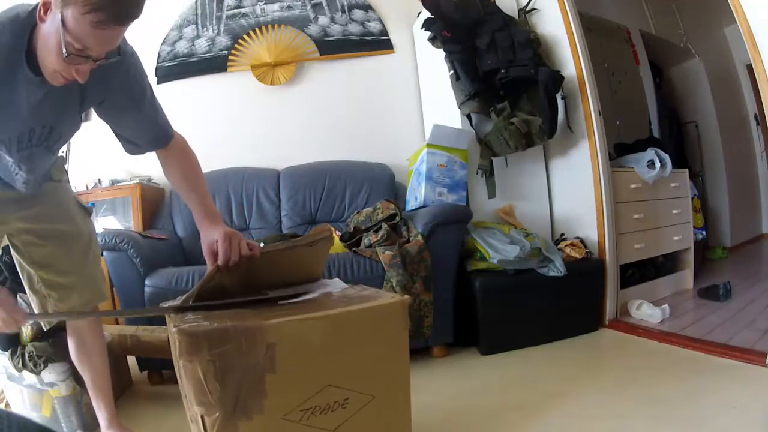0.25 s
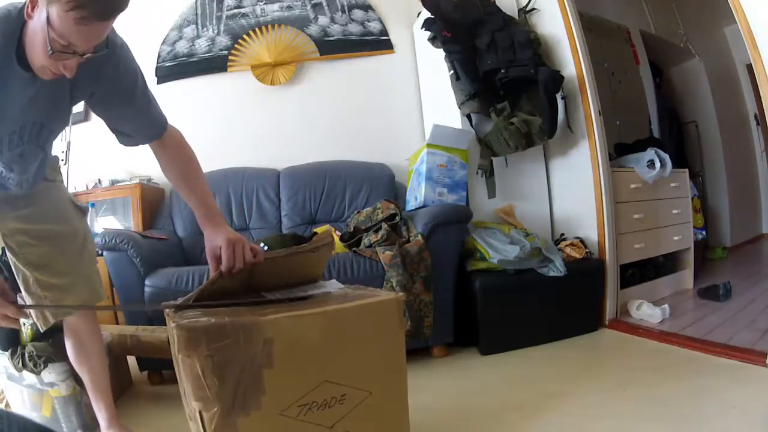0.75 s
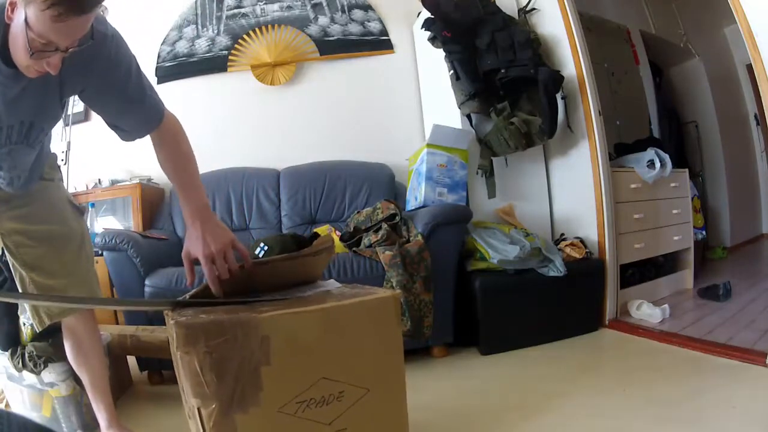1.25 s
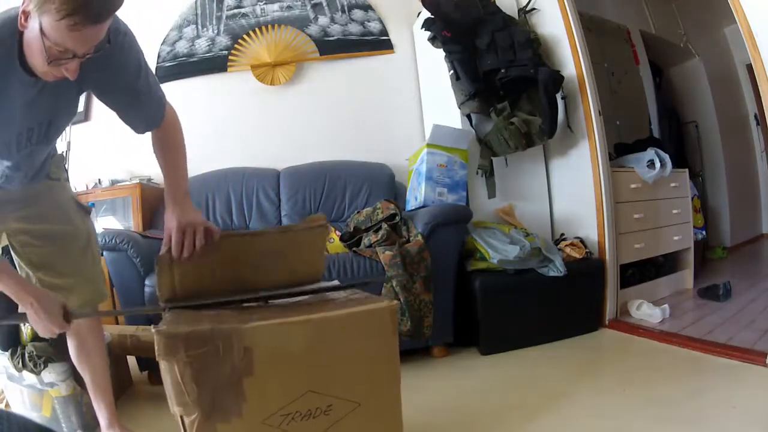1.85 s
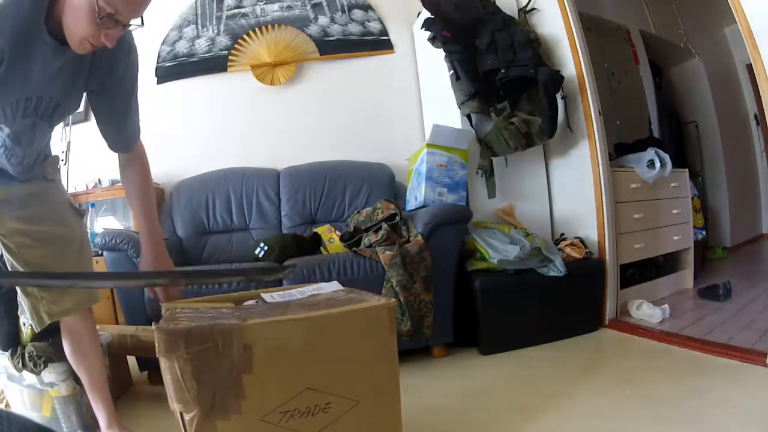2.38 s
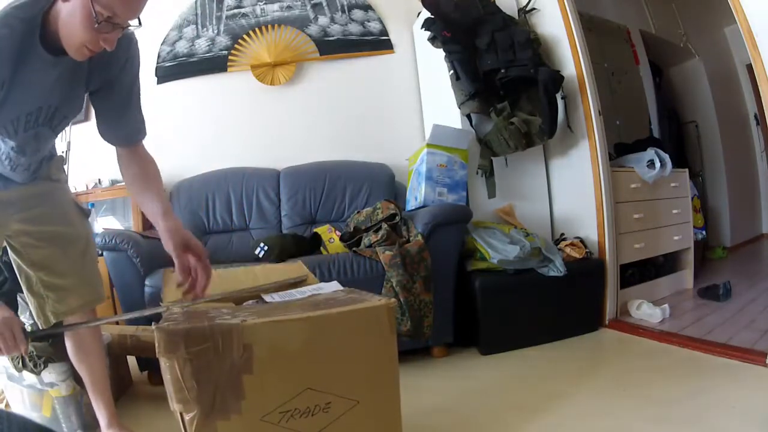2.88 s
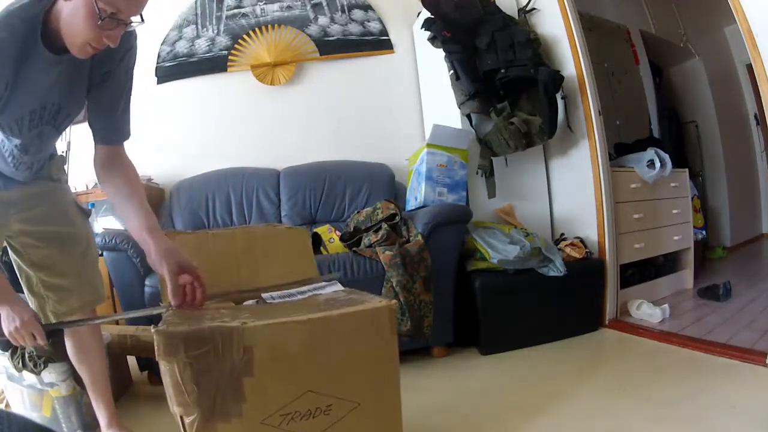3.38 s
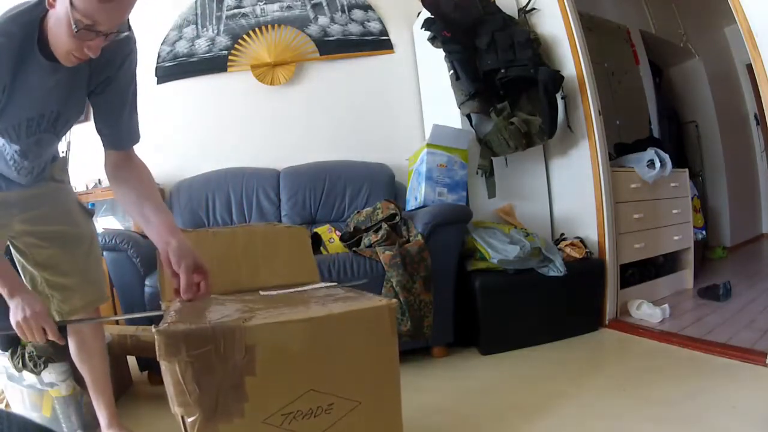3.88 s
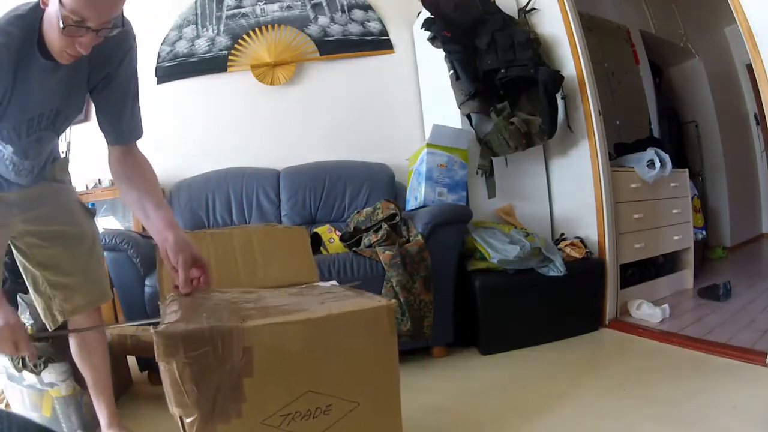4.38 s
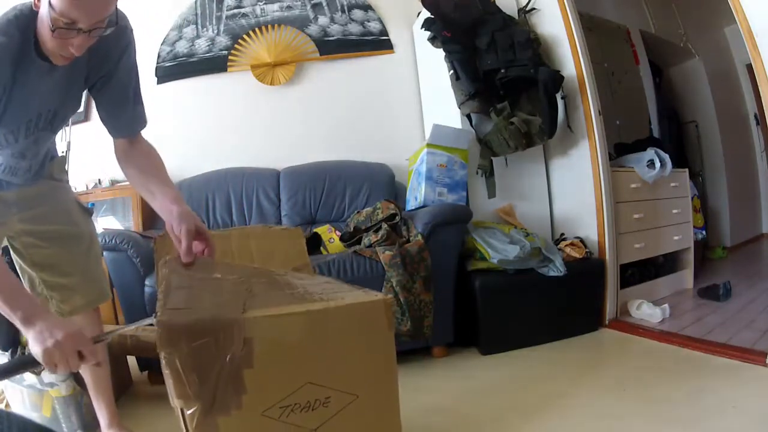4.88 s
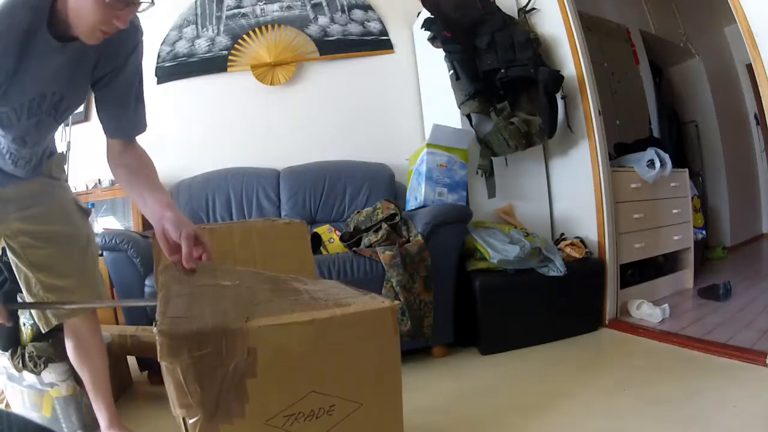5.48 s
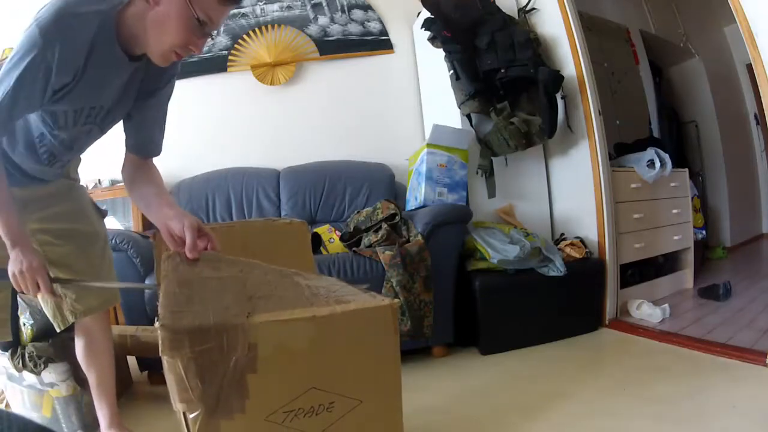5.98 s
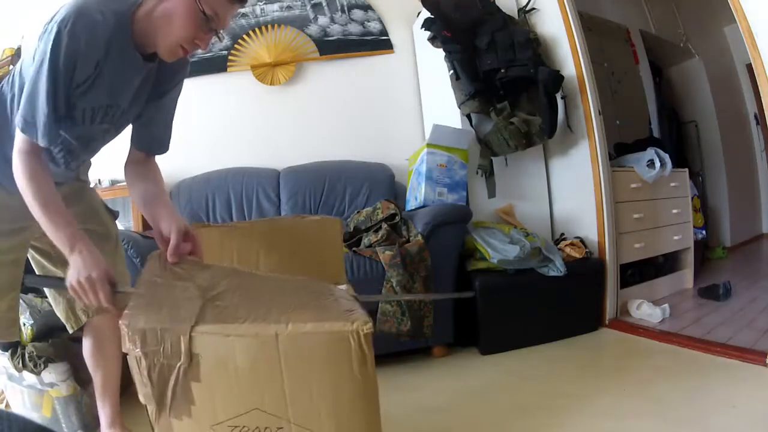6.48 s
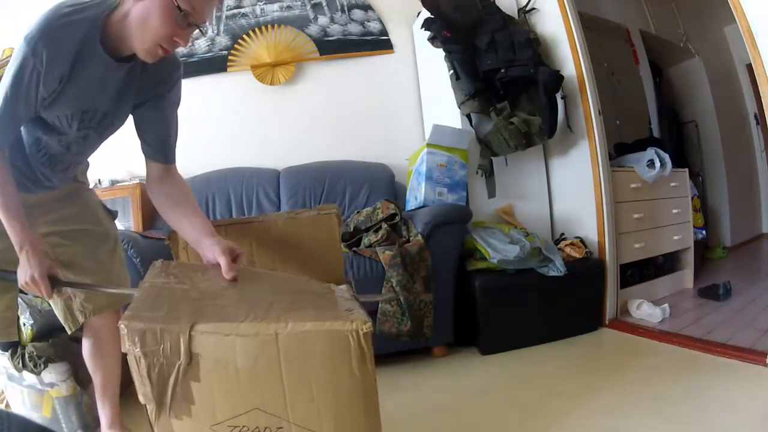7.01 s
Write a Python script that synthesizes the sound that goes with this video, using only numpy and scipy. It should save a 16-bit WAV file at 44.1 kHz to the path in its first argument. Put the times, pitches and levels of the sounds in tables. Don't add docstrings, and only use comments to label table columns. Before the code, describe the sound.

Indoors, cardboard rumbles and rasps in short irregular strokes, flaps thudding lightly. A thin squeak of blade on tape follows, then small crackles. In the middle come sharp, boxy bangs with snapping tape, the loudest just before five seconds, and another duller boom later. Rustling scrapes and weak knocks finish it. A camera microphone under a metre away on the floor sounds boxed-in and low-fidelity, with a short room echo and a faint fan.

```python
import sys
import numpy as np
from scipy import signal
from scipy.fft import rfft, irfft
from scipy.io import wavfile
from scipy.ndimage import uniform_filter1d

SR = 44100
rng = np.random.default_rng(int(sys.argv[2]) if len(sys.argv) > 2 else 0)


def transcribe(u):
    v = np.clip(np.atleast_2d(u).T, -1, 1)
    q = np.round(v * 32767).astype(np.int16)
    wavfile.write(sys.argv[1], SR, q)


def linear_from_db(decibels):
    return 10 ** (np.asarray(decibels, float) / 20)


N = 319725

SIZE = 32768
HZ = np.fft.rfftfreq(SIZE, 1 / SR) + 1e-3
LONG_HZ = np.fft.rfftfreq(N, 1 / SR) + 1e-3
DELAY_S = .0025


def colour(points, hz):
    f, db = np.log2(np.transpose(points)[0]), np.transpose(points)[1]
    x = np.log2(hz)
    octaves_outside = np.clip(f[0] - x, 0, 4) + np.clip(x - f[-1], 0, 4)
    return np.interp(x, f, db) - 24 * octaves_outside


def causal(db):
    cepstrum = irfft(db * np.log(10) / 20)
    half = len(cepstrum) // 2
    cepstrum[1:half] *= 2
    cepstrum[half + 1:] = 0
    return np.exp(rfft(cepstrum))


def bump(hz, centre_hz, octaves):
    return np.exp(-.5 * (np.log2(hz / centre_hz) / octaves) ** 2)


def shaped(x, db):
    y = irfft(rfft(x) * linear_from_db(db), len(x))
    return y / np.std(y)


def grains(rate, spread_db):
    size = np.minimum(rng.exponential(size=N), 4)
    slips = rng.random(N) < rate / SR
    return slips * rng.standard_normal(N) * linear_from_db(spread_db * size)


def walk(rate):
    k = int(SR / rate)
    steps = np.repeat(rng.standard_normal(N // k + 1), k)
    return 0.78 * uniform_filter1d(uniform_filter1d(steps, k), k)[:N]


# (time after the direct sound [s], sign, level [dB])
ECHOES = [(.0013, -0.47, -4.5), (.006, 0.64, -19.5), (.0125, -0.5, -3.5), (.019, 0.77, -16), (.027, 1, -17)]


def room(t60, tail_db, echo_db, direct_db=0.):
    t = np.arange(SIZE) / SR
    decay = linear_from_db(tail_db - np.minimum(60 * t / max(t60, .05), 200))
    build_up = 1 - np.exp(-t / 0.0024)
    tail = decay * build_up * rng.standard_normal(SIZE) * (t < .6)
    early = np.zeros(SIZE)
    early[0] = linear_from_db(direct_db)
    for n, (s, sign, db) in enumerate(ECHOES):
        k = int(s * SR)
        early[k] += sign * linear_from_db(db + (echo_db if n else direct_db))
        early[k:k + 60] += linear_from_db(db + echo_db - 18.5) * rng.standard_normal(60)
    return -rfft(early) + rfft(tail) * linear_from_db(-7 * bump(HZ, 151, 0.44))


def add(out, s, spectrum, peak_db):
    k = int(s * SR)
    y = irfft(spectrum)[:N - k]
    out[k:k + len(y)] += y * linear_from_db(peak_db) / np.abs(y).max()


# (frequency [Hz], level [dB per Hz])
AIR = [(12, -55), (20, -4.5), (101, -7), (175, -3), (202, 1.5), (263, -1), (342, -3), (414, -7),
       (501, -9.5), (771, -15.5), (868, -22.5), (1000, -25.5), (1160, -31), (3470, -31), (6000, -42.5),
       (7800, -91), (13200, -120)]
# (frequency [Hz], width [Hz], level [dB])
FAN = [(96.4, 6.8, -59.5), (214.8, 5.2, -52.5), (304, 22, -63), (344.8, 40, -49), (483, 8.3, -81),
       (704, 18, -83), (968, 14, -68), (2940, 230, -83.5)]


def air():
    out = linear_from_db(-45 + 0.21 * walk(4.3)) * shaped(rng.standard_normal(N), colour(AIR, LONG_HZ))
    for f, width, db in FAN:
        hum_db = -20 * np.log10(1 + (2 * (LONG_HZ - f) / width) ** 2)
        out += linear_from_db(db) * shaped(rng.standard_normal(N), hum_db)
    return out


def drone():
    t = np.arange(N) / SR
    middle_s, length_s, pitch_hz, level_db = 5.25, .2, 99.4, -45.5
    swell = np.exp(-.5 * ((t - middle_s) / length_s) ** 2)
    return linear_from_db(level_db + 1.5 * walk(12)) * swell * np.sin(2 * np.pi * pitch_hz * t)


# (time [s], peak level [dB], board frequency [Hz], ring t60 [s])
THUDS = [(0.084, -29.5, 90, 0.49), (0.516, -23.5, 54.5, 0.31), (0.737, -25.5, 60, 0.26),
         (1.02, -33.5, 90, 0.19), (1.257, -38, 90, .2), (1.44, -34.5, 69.6, 0.41), (1.621, -37, 99, 0.2),
         (1.652, -27, 55, 0.22), (1.7, -27, 48, 0.48), (2.657, -19.5, 55, .25), (2.84, -19, 101, 0.22),
         (3.348, -30, 65.5, 0.15), (3.93, -30, 69.5, 0.28), (4.086, -17.5, 58, 0.16), (4.35, -25, 55, 0.24),
         (4.816, -32, 47, 0.15), (5.519, -34, 55, 0.22), (5.876, -26, 80.4, 0.33), (5.961, -33, 50, 0.16),
         (6.201, -35, 109, 0.42), (6.392, -21, 50, 0.086), (7.118, -36, 45.4, 0.34), (7.18, -32, 45, 0.31)]


def thuds():
    out = np.zeros(N)
    for s, db, hz, t60 in THUDS:
        boards = causal(40 * bump(HZ, 87, 1.85) + 12 * bump(HZ, hz, 0.35))
        add(out, s + DELAY_S, boards * room(t60, tail_db=-27.5, echo_db=-4), db)
    return out


# (time [s], blade drag [dB], weight on the panels [dB],
# floor shake relative to the panel rumble [dB])
GRIP = [(0, -50, -37.5, -16), (.7, -54.5, -46, -8), (1.85, -54.5, -47.5, -12.5), (2.05, -64, -49.5, -9.5),
        (3.0, -71, -47, -5), (3.2, -69, -51, -5), (3.35, -57, -46, -11), (3.58, -81, -45, -13),
        (3.88, -64, -46.5, -8.5), (4.12, -44.5, -36, -14), (4.25, -50.5, -36.5, -6),
        (4.55, -49.5, -41.5, -16), (4.919, -40, -32.5, -18), (5.219, -55, -40, -16),
        (5.3, -68.5, -48.5, -13), (6.15, -69, -47.5, -9.5), (6.249, -56, -39.5, 1.5),
        (7.25, -59, -44.5, -37)]
# (time at full speed [s], hold [s], scrape level [dB], panel rumble over scrape [dB])
STROKES = [(0.083, 0.038, -43.5, 11.5), (0.285, 0.047, -40, 6.5), (0.363, 0.078, -46, 9),
           (0.61, 0.028, -59.5, 17), (0.747, 0.12, -52.5, 10.5), (1.01, 0.038, -50.5, 2),
           (1.244, 0.037, -46.5, 8.5), (1.39, 0.046, -48, 8.5), (1.532, 0.057, -48, 9.5),
           (1.668, 0.066, -49.5, 20.5), (1.75, 0.045, -47, -8), (1.982, 0.02, -50.5, 8),
           (2.37, 0.078, -60, 15.5), (2.678, 0.015, -58, 9), (2.877, 0.034, -55, 6),
           (3.282, 0.027, -64, 14), (3.392, 0.12, -55.5, 12), (3.66, 0.022, -55.5, 7),
           (3.958, 0.13, -48.5, 5), (4.287, 0.13, -43, 4.5), (4.417, 0.079, -45, 11.5),
           (4.637, 0.24, -61, -2), (4.81, 0.023, -43.5, 19.5), (5.056, 0.18, -52, 11.5),
           (5.56, 0.029, -57, 10), (6.01, 0.056, -60.5, 17), (6.336, 0.038, -41.5, 2),
           (6.452, 0.02, -50, 7), (6.547, 0.02, -44.5, -5), (6.67, 0.072, -57, -8),
           (6.904, 0.023, -57.5, 13)]


def effort():
    speed_up_db_per_s, slow_down_db_per_s = 211, 136
    t = np.arange(0, N / SR + .002, .001)
    grip_s, *grip = np.transpose(GRIP)
    drag_db, weight_db, shake_db = (np.interp(t, grip_s, column) for column in grip)
    scrape, rumble = linear_from_db(2 * drag_db), linear_from_db(2 * weight_db)
    for s, hold, db, panel_db in STROKES:
        lost_db = speed_up_db_per_s * np.maximum(s - t, 0)
        lost_db = lost_db + slow_down_db_per_s * np.maximum(t - s - hold, 0)
        scrape = scrape + linear_from_db(2 * (db - lost_db))
        rumble = rumble + linear_from_db(2 * (db + panel_db - lost_db))
    levels = (10 * np.log10(scrape), 10 * np.log10(rumble), shake_db)
    return (np.interp(np.arange(N) / SR, t, db) for db in levels)


# (frequency [Hz], width [Hz], level [dB])
BOX = [(145, 99, 7.5), (186, 18, 0), (238.5, 17, 9), (310, 35, 7), (348, 6.1, 4), (400.6, 13.7, 7.5),
       (457, 120, -4.5), (474, 15, 0.5), (617, 23, 6), (716, 20, -0.5), (804, 81, 7)]


def resonances(hz, reach):
    return sum(k * db / (1 + (2 * (hz - f) / w) ** 2) for k, (f, w, db) in zip(reach, BOX))


# (frequency [Hz], level [dB per Hz])
SCRAPE = [(530, -16), (900, -5.5), (1030, -17), (1250, -9.5), (1360, -12.5), (1670, -7), (2020, -2),
          (2410, -4), (2910, 1.5), (3470, -6), (4030, -0.5), (5280, -7), (6000, -11.5), (7800, -42),
          (13200, -120)]


def hands():
    scrape_db, board_db, shake_db = effort()
    near = rfft(irfft(room(0.36, tail_db=-18.0, echo_db=-2.0)), N)
    moved = rfft(irfft(room(0.5, tail_db=-15.0, echo_db=-3.0)), N)

    def heard(x, path):
        return irfft(rfft(x) * path, N)

    board_colour = colour(BOOM, LONG_HZ) + resonances(LONG_HZ, np.full(len(BOX), .45))
    board = shaped(heard(grains(2000, spread_db=.6), near), board_colour)
    thump = shaped(rng.standard_normal(N), 40 * bump(LONG_HZ, 57.5, 3.72))

    place = np.pi / 2 * walk(3)
    slips = np.cos(place) * heard(grains(1200, spread_db=4.0), near)
    slips = slips + np.sin(place) * heard(grains(1200, spread_db=3.5), moved)

    fibres = colour(SCRAPE, LONG_HZ)
    dull = shaped(slips, fibres - 30 * (LONG_HZ > 2500))
    bright = shaped(slips, fibres - 30 * ((LONG_HZ <= 2500) | (LONG_HZ > 3500)))
    thin = shaped(slips, fibres - 30 * (LONG_HZ <= 3500))
    bands = linear_from_db(-5.5 + 1.5 * walk(13)) * dull
    bands = bands + linear_from_db(-4.0 + 1.5 * walk(11)) * bright
    bands = bands + linear_from_db(-4.5 + 1.7 * walk(9)) * thin
    scrape = linear_from_db(scrape_db + 0.65 * walk(21.94)) * bands

    shake_level = linear_from_db(board_db + shake_db) + linear_from_db(-64)
    shake = shake_level * linear_from_db(5.6 * walk(7.2)) * thump
    return linear_from_db(board_db - 2.0) * board + shake + scrape


# (time [s], frequency [Hz], level [dB])
SQUEAK = [
    [(2.37, 796, -70), (2.41, 790, -46), (2.46, 850, -47), (2.52, 883, -52), (2.6, 880, -52)],
    [(2.4, 2000, -72), (2.44, 2000, -60), (2.485, 2000, -64), (2.51, 2000, -55), (2.59, 1980, -55),
     (2.62, 1970, -66), (2.655, 1980, -59), (2.7, 1975, -82)],
    [(2.35, 3060, -80), (2.39, 3020, -57), (2.47, 2990, -60), (2.54, 2990, -61), (2.63, 2960, -88)],
    [(2.44, 1830, -75), (2.5, 1840, -64), (2.58, 1800, -62), (2.66, 1810, -72)],
]


def squeak():
    out, t = 0, np.arange(N) / SR
    for partial in SQUEAK:
        s, hz, db = np.transpose(partial)
        flutter, waver_hz = .9 + .45 * walk(200), 70 * walk(400)
        phase = 2 * np.pi * np.cumsum(np.interp(t, s, hz) + waver_hz) / SR
        out += linear_from_db(np.interp(t, s, db, -200, -200)) * flutter * np.sin(phase)
    return out


# (time [s], peak level [dB], frequency [Hz], t60 [s])
RINGS = [(4.8156, -6, 1740, 0.019), (4.829, -10, 1780, 0.035), (4.829, -12, 2800, 0.027),
         (4.845, -22.5, 1700, .03), (4.8195, -1, 175, 0.08), (.729, -30.5, 220, .08),
         (.09, -25.5, 202, 0.075), (4.822, -24, 1450, 0.17), (4.851, -10, 174, 0.15),
         (4.834, -11.5, 375, 0.106), (4.0855, -19, 2000, 0.033), (4.098, -14.5, 2875, 0.032),
         (4.099, -30, 1300, .04), (5, -27, 350, 0.03), (4, -24, 400, 0.035), (4.3527, -17, 1970, 0.02),
         (4.358, -15, 450, 0.063), (4.366, -20, 2950, 0.068), (4.36, -31, 1800, 0.1), (4.9, -21, 400, .12),
         (3.93, -33, 800, 0.051), (6.7, -28, 232, 0.06), (6.229, -28, 290, 0.093),
         (6.376, -18.5, 280, 0.044), (5.725, -36, 214, 0.1), (6.449, -42, 1980, .03),
         (6.547, -30.5, 840, 0.019), (1.675, -35, 1230, .08), (1.6755, -33, 2000, .025),
         (1.692, -19.5, 357, .03), (1.68, -34, 1550, 0.051), (1.257, -29.5, 390, 0.18),
         (1.045, -48, 1240, 0.043), (1.257, -32.5, 650, .06), (4.8155, -4.5, 710, 0.017),
         (3.809, -34.5, 620, 0.03), (3.829, -31, 443, 0.045), (5.535, -18, 460, 0.049),
         (5.542, -17.5, 399, .06), (2.139, -39, 794, 0.037), (1.636, -32, 630, .04),
         (3.941, -26.5, 510, 0.034), (4.42, -26, 280, .12), (6.04, -51, 1200, .03),
         (2.66, -40, 1210, 0.016), (2.85, -26.5, 319, 0.1), (4.612, -30.5, 680, 0.034),
         (.6125, -44, 2200, 0.046), (1.0006, -52, 2970, 0.042), (1.52, -29, 400, 0.22)]
MORE_RINGS = [
    (4.853, -12, 175, .1),
    (4.358, -12, 300, .04),
    (4.39, -22, 200, .08),
    (3.93, -32, 1300, .02),
    (3.943, -33, 1250, .02),
    (2.849, -25, 180, .04),
    (4.39, -24, 2950, .08),
    (4.395, -20, 420, .07),
    (1.461, -30, 620, .04),
    (2.66, -17, 420, .02),
]


def rings():
    out, t = np.zeros(N), np.arange(SIZE) / SR
    for s, db, hz, t60 in RINGS + MORE_RINGS:
        decay = linear_from_db(-np.minimum(60 * t / max(t60, .01), 200))
        rough = 2.5 * min(hz / 2000, 1) * uniform_filter1d(rng.standard_normal(SIZE), size=60)
        mode = decay * np.sin(2 * np.pi * hz * t) * (1 + rough)
        add(out, s, rfft(mode) * room(0.34, tail_db=-33, echo_db=-5.0), db)
    return out


# (time [s], peak level [dB], centre frequency [Hz])
TICKS = [(0.812, -33, 4160), (1.3657, -40, 1760), (1.6354, -36, 1840), (1.6751, -24, 1970),
         (1.6864, -33, 1290), (2.1374, -42, 1830), (2.2896, -41.5, 3740), (2.3699, -47, 1570),
         (2.391, -38, 3300), (3.266, -38, 4000), (3.288, -41, 2900), (3.372, -38, 4600), (3.497, -39, 1600),
         (3.509, -40, 2900), (3.465, -41, 3100), (3.44, -43, 4400), (3.649, -37, 2910),
         (3.6695, -35.5, 1960), (3.6825, -37.5, 2860), (3.8087, -43, 2030), (3.91, -41, 2290),
         (3.93, -24.5, 1260), (3.9403, -34, 3970), (4.0853, -9.5, 2250), (4.0973, -16, 2870),
         (4.253, -35, 3060), (4.3528, -10, 2080), (4.3651, -11, 3430), (4.5769, -39, 2940),
         (4.61, -32, 3020), (4.8162, -7.5, 1700), (4.8295, -14, 2700), (5.0384, -31, 2380),
         (6.2048, -34, 1600), (6.547, -30, 2890), (6.892, -42, 2900)]
FLECKS = [(0.1204, -35, 3530), (0.3, -35, 3900), (0.67, -38, 4980), (0.95, -44, 4160), (1.046, -35, 4100),
          (1.2, -35, 4920), (1.1, -41, 5500), (1.135, -41, 5600), (1.003, -40, 4600), (.525, -36, 2900),
          (.55, -39, 2900), (.62, -40, 2100), (1.195, -35, 5600), (.795, -39, 4200), (6.045, -46, 2100),
          (3.255, -43, 4800), (1.4194, -41, 4180), (2.703, -45, 3020), (2.695, -37, 4000),
          (5.5594, -41, 3900), (6.3394, -37, 4200), (6.3744, -31, 3890), (6.5465, -31, 4070),
          (6.565, -37, 4700), (7.03, -47, 3000), (7.124, -41, 2100), (4.456, -30, 2500),
          (6.5325, -35, 5500), (.0613, -35, 2890), (3.825, -45, 3100), (4.062, -40, 2900),
          (5.523, -42, 2200)]


def ticks():
    out = np.zeros(N)
    for s, db, hz in list(TICKS) + list(FLECKS):
        snap = causal(colour(SCRAPE, HZ) + 10 * bump(HZ, hz, 0.36) + 3 * bump(HZ, hz, 0.054))
        add(out, s, snap * room(0.3, tail_db=-25, echo_db=-2.0), db)
    return out


# (frequency [Hz], level [dB per Hz])
BOOM = [(79, -33), (135, 2), (317, -3.5), (401, -1), (463, -2.5), (633, -3), (689, -5), (772, -13.5),
        (997, -30), (1300, -31.5), (1690, -55), (2860, -120)]
# (frequency [Hz], level [dB per Hz])
CRACK = [(530, -8.5), (900, -9.5), (1070, -22), (1170, -10.5), (1520, -12), (1740, -9.5), (1880, -7),
         (2490, -21), (2670, -27), (2910, -6), (3390, -18), (5330, -17), (6000, -34), (7800, -115),
         (13200, -120)]
# (time [s], peak level [dB], boom centre [Hz], crack relative to boom [dB], ring t60 [s])
BENDS = [(0.086, -21.5, 172, -13.5, 0.33), (0.226, -29.5, 162, -23, 0.37), (0.299, -21.5, 296, -14, 0.21),
         (0.517, -22, 375, -10, 0.22), (0.599, -36, 191, -29, 0.31), (0.665, -30, 197, -31, 0.3),
         (0.74, -22, 145, -16, 0.41), (1.036, -22.5, 230, -14, 0.22), (1.255, -25, 149, -29, 0.43),
         (1.458, -30, 145, -20, 0.71), (1.518, -24.5, 400, -20, 0.33), (1.653, -24, 310, -18, 0.14),
         (1.674, -21.5, 310, -18, 0.26), (1.689, -22, 340, -27, 0.37), (2.183, -34.5, 346, -9, 0.12),
         (2.278, -30.5, 234, -18, 0.35), (2.449, -29, 248, -14, 0.3), (7.122, -30, 356, -17, 0.18)]
BLOWS = [(2.6575, -13, 175, -36, 0.27), (2.842, -26, 106, -53, 0.39), (3.279, -22, 367, -33, 0.48),
         (3.36, -23.5, 330, -21, 0.087), (3.928, -22.5, 273, -20, 0.13), (3.938, -26, 233, -7, 0.29),
         (4.0824, -5, 320, -10, 0.24), (4.35, -9, 328, -10, 0.22), (4.814, -4.5, 258, -3, 0.28),
         (5.519, -8, 464, -28, 0.23), (5.876, -20.5, 148, -23.5, 0.38), (6.185, -26, 219, -34, 0.5),
         (6.229, -24.5, 340, -11, 0.5), (6.341, -20, 315, -21, 0.67), (6.362, -14.5, 212, -22, 0.32)]
# (time [s], peak level [dB], boom centre [Hz], ring t60 [s])
FLAP = [(.519, -19.5, 143, 0.53), (1.035, -22.5, 610, 0.39), (1.459, -30, 600, 0.11),
        (3.928, -24.5, 614, 0.11), (1.366, -32, 610, 0.18), (2.84, -18, 235, 0.32),
        (3.279, -22.5, 600, 0.31), (4.0825, -6, 660, 0.24), (4.09, -19, 222, 0.33), (4.35, -5.5, 596, 0.25),
        (4.813, -2.5, 485, 0.26), (4.8145, -5.5, 310, 0.26), (6.39, -25, 147, .16)]


def knocks():
    out, crack = np.zeros(N), causal(colour(CRACK, HZ))
    flap_crack_db = -46
    flaps = [(s, db, hz, flap_crack_db, t60) for s, db, hz, t60 in FLAP]
    for blow_s, db, hz, crack_db, t60 in BENDS + BLOWS + flaps:
        s = blow_s + DELAY_S
        reach = .25 + .8 * rng.random(len(BOX))
        struck = 7 * bump(HZ, hz, 0.65) + 5.4 * bump(HZ, hz, 0.1)
        struck = struck - 6 * np.clip(np.log2(hz / 1.8 / HZ), 0, 3)
        boom = causal(colour(BOOM, HZ) + resonances(HZ, reach) + struck)
        add(out, s, boom * room(t60, tail_db=-27, echo_db=-0.5), db)
        direct_db = min(0, .5 * (crack_db + 7))
        add(out, s, crack * room(t60, tail_db=-16.5, echo_db=9.0, direct_db=direct_db), db + crack_db)
    return out


def scene():
    background = air() + drone() + thuds()
    blade = hands() + squeak() + rings() + ticks()
    return (background + blade + knocks())[None]


def thin_treble(x, floor_db, above_hz, rise_db_per_khz):
    hz, _, z = signal.stft(x, SR, nperseg=2048, scaling="psd")
    over_khz = (hz[:, None] - above_hz) / 1000
    power = uniform_filter1d(np.abs(z) ** 2, size=9, axis=1)
    faint = power < linear_from_db(2 * (floor_db + rise_db_per_khz * over_khz))
    z = np.where(faint & (over_khz > 0), z * linear_from_db(-23), z)
    return signal.istft(z, SR, nperseg=2048, scaling="psd")[1][:, :N]


def low_pass(x):
    return signal.sosfilt(signal.butter(12, 16020, fs=SR, output="sos"), x)


def record(dry):
    slow = np.clip(signal.resample_poly(dry, 40, 147, axis=1), -1, 1)
    third = 2 * np.pi * np.arange(slow.shape[1]) / 3
    late = 0.34 * np.cos(third + walk(60)[:len(third)])
    steps = np.repeat(slow, 4, axis=1)
    steps[:, ::4] -= late * np.diff(slow, axis=1, prepend=0)
    held = signal.resample_poly(steps, 147, 160, axis=1)[:, :N]
    lowpass = signal.cheby1(10, .3, 15500, fs=SR, output="sos")
    top = signal.sosfiltfilt(lowpass, held)
    thin = thin_treble(top, floor_db=-117.5, above_hz=12950, rise_db_per_khz=2.6)
    return low_pass(np.clip(thin, -1, 1))


dry = scene()
out = record(dry)
transcribe(out)
```